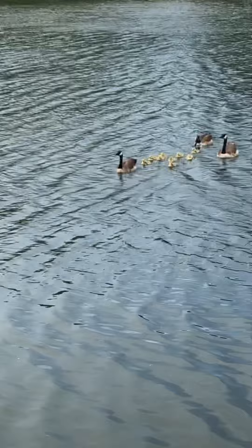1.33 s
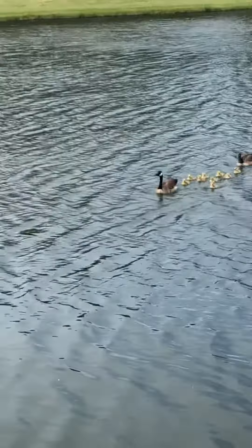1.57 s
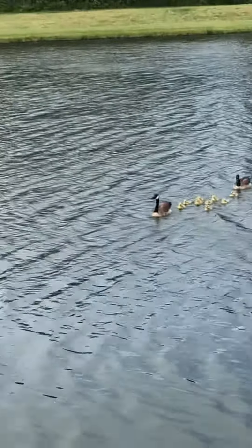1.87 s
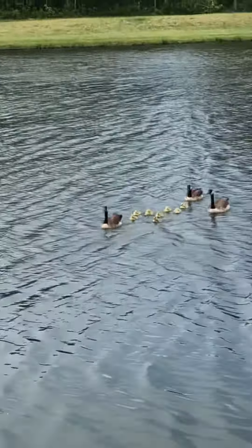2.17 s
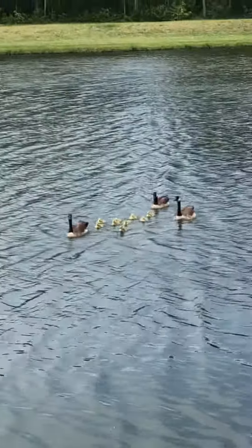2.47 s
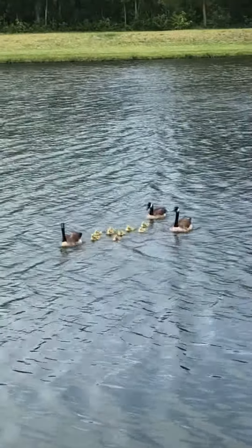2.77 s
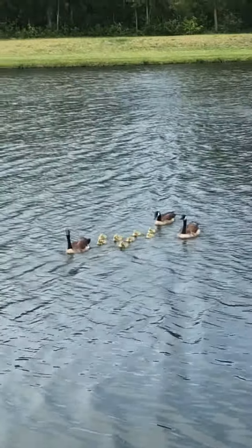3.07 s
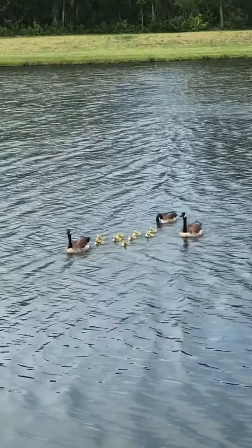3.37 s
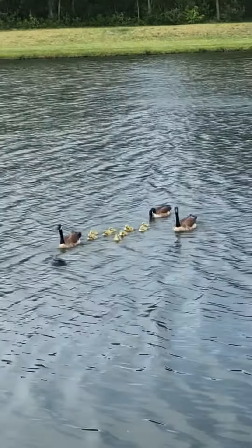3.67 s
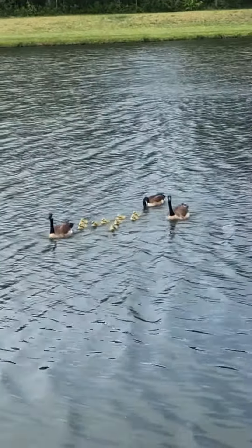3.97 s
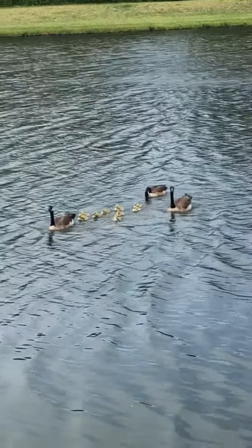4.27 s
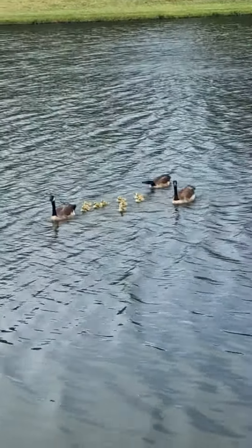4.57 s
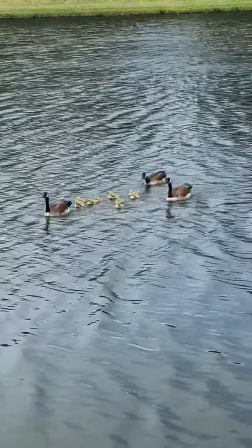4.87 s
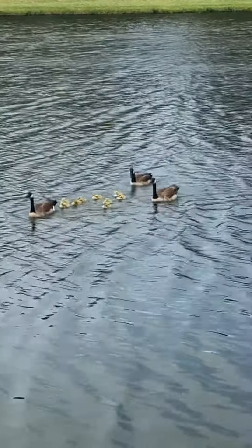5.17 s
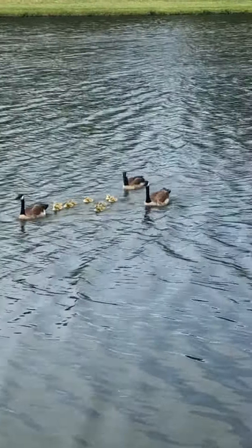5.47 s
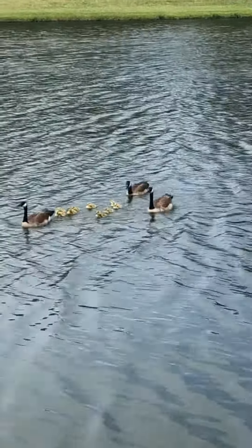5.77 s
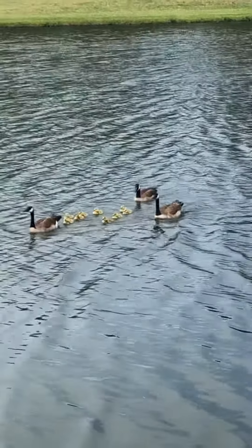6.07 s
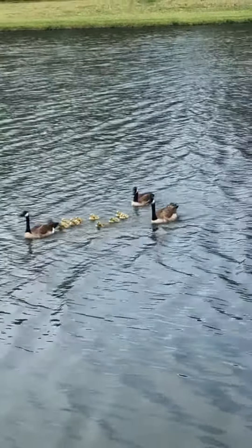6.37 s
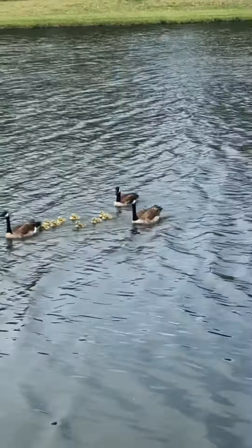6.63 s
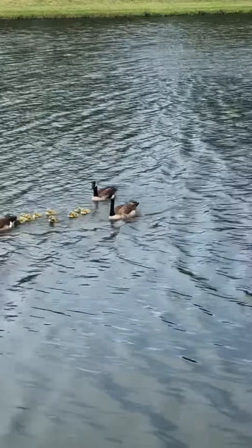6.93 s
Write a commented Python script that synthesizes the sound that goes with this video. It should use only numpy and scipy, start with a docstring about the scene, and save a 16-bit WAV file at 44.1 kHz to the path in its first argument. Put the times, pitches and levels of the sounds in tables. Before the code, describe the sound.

A steady, low outdoor rumble with a faint wavering hum lies under the whole seven seconds beside a pond. During the first three seconds, a sleeve rustles faintly near the handheld microphone, with tiny finger scuffs and dry ticks, the sharpest at about 1.2 seconds. Small birds give thin, faint, falling whistles between 1 and 2.5 seconds. At 1.4 seconds a goose gives one very short, brassy honk. Soft, low wind bumps hit the microphone from about 2.8 seconds and are strongest around 4.5 seconds. A louder, fuller honk comes at 4.8 seconds, followed by two faint ticks, then a shriller, slightly rougher honk at 5.5 seconds. Each honk leaves a light, quickly fading echo from the far bank. After that only the rumble remains, as the hum sinks away.

```python
"""Geese on a pond give three short, brassy honks, and the far bank throws them back.
Each honk comes from skin flaps in the bird's voice box snapping shut hundreds of times a second.
The hand that holds the camera makes faint sleeve rustles, finger scuffs and ticks.
Wind bumps the microphone, and small birds whistle thinly across the water.
Under it all lies a steady outdoor rumble with a faint low hum."""
import sys
import numpy as np
from scipy import signal
from scipy.fft import rfft, irfft
from scipy.io import wavfile

SR = 44100
rng = np.random.default_rng(int(sys.argv[2]) if len(sys.argv) > 2 else 0)


def master(y):
    """Save y as 16-bit WAV."""
    cut = np.clip(np.atleast_2d(y).T, -1, 1)
    pcm = np.round(cut * 32767)  # scale
    wavfile.write(sys.argv[1], SR, pcm.astype(np.int16))


N = 317520
HAND_REST_S = 4.6  # the hand moves until this time


def geese(beam_hz=3600):
    """Three honks; treble travels forward, so the banks get more from a goose that faces them."""
    # How the throat shapes each honk: pitch_hz, level_db
    soft_throat = [(800, -6), (1600, 1.5), (2400, -8), (3200, -8), (4000, -9.5), (4800, -16), (5600, -23.5),
                   (6400, -38), (7200, -30.5), (8000, -35), (9600, -57), (15200, -71)]
    full_throat = [(780, -5), (1560, 1.5), (2340, -5.5), (3120, -8), (3900, -12.5), (4680, -11),
                   (5460, -15.5), (6240, -22.5), (7020, -23), (7800, -20), (9360, -31), (10920, -27),
                   (13260, -32), (14820, -35)]
    shrill_throat = [(800, -2), (1600, 2), (2400, -11.5), (3200, -19), (4000, -15.5), (4800, -14.5),
                     (5600, -16), (6400, -11.5), (7200, -10.5), (8000, -17.5), (9600, -26.5), (11200, -40),
                     (13600, -33), (15200, -38)]
    # Honks: start_s, length_s, level_db, effort_fade_db, start_hz, middle_hz, end_hz, attack_s,
    # release_s, roughness (0-1), beak_lift_db (as the beak closes), treble_to_banks_db
    honks = [(1.398, 0.051, -35, 25, 811, 798.5, 769, 0.011, 0.0062, 0.06, 24, -4),
             (4.8042, 0.06, -31, 14, 767.6, 787.5, 736, 0.0042, 0.015, 0.05, 5, 0),
             (5.4966, 0.0585, -32, 7, 800, 795.6, 734, 0.011, 0.034, 0.15, 7, -3)]
    near, to_banks = np.zeros((2, N))
    for (start_s, *row, treble_db), throat in zip(honks, [soft_throat, full_throat, shrill_throat]):
        voice = honk(row, throat)
        add(near, start_s, voice)
        add(to_banks, start_s, colour(voice, [(beam_hz / 2, 0), (beam_hz, treble_db)]))
    return near + banks(to_banks)


def honk(row, throat, beak_hz=3150, beak_width_hz=450, rasp_db_per_octave=6.5):
    """The voice box snaps shut once a cycle, making harmonics: tones at multiples of the pitch."""
    length_s, db, fade_db, start_hz, middle_hz, end_hz, attack_s, release_s, rough, beak_db = row
    t = np.arange(round(length_s * SR)) / SR
    progress = t / length_s
    pitch_hz = np.polyval(np.polyfit([0, .5, 1], [start_hz, middle_hz, end_hz], 2), progress)
    # The voice is unsteady as it starts, and cracks briefly as the pitch turns down.
    unsteady = 1.3 * np.exp(-t / .008)
    crack = 1.2 * np.exp(-((progress - .62) / .09) ** 2)
    rough = rough * (1 + unsteady + crack)
    flutter = rough * band_noise(len(t), 185, .25)  # the flaps shake in a rough honk
    jitter = .0045 * band_noise(len(t), 400, 1)
    cycles = np.cumsum(pitch_hz * (1 + .024 * flutter + jitter)) / SR
    fade_in = np.sin(np.pi / 2 * np.clip(t / attack_s, 0, 1))
    fade_out = np.sin(np.pi / 2 * np.clip((length_s - t) / release_s, 0, 1))
    gate = fade_in * fade_out
    effort = gate * amp(-fade_db * progress)
    harmonic = np.arange(1, 21)[:, None]
    hz = harmonic * middle_hz
    # Only a wide swing closes the flaps fully, and only full closure makes treble.
    closure = np.clip((gate - .45) / .45, 0, 1) ** 2
    treble = (closure + .02) ** np.clip((harmonic - 3) / 9, 0, 1)
    beak_band = np.exp(-((hz - beak_hz) / beak_width_hz) ** 2)
    beak = amp(beak_db * .5 * np.tanh(4 * (progress - .5)) * beak_band)
    # No two snaps are alike: higher harmonics waver more.
    waver = np.array([band_noise(len(t), 90, 1.2) for _ in harmonic])
    waver *= np.minimum(.011 * harmonic ** 1.4, .45)
    # Higher harmonics also swell with effort and die first.
    swell = gate ** .5 * effort ** (.033 + .49 * np.log(harmonic))
    swell *= treble * beak * np.exp(waver + .8 * flutter)
    swell /= np.sqrt(np.mean(swell ** 2, 1, keepdims=True))
    # The throat rings after each snap, which makes each harmonic lag a little.
    throat_db = level_at(throat, hz[:, 0])
    mirrored_gain = np.log(amp(np.r_[throat_db[0] - 20, throat_db, throat_db[::-1]]))
    lag = -.33 * signal.hilbert(mirrored_gain).imag[1:len(harmonic) + 1, None]
    voice = (amp(throat_db)[:, None] * swell * np.cos(2 * np.pi * harmonic * cycles + lag)).sum(0)
    # Air escapes in one puff each cycle, brighter than the tone.
    puffs = rng.standard_normal(len(t)) * (1 + np.cos(2 * np.pi * cycles))
    bright = [(f, level + rasp_db_per_octave * np.log2(f / middle_hz)) for f, level in throat]
    rasp = colour(puffs, [(300, -26)] + bright) * effort * gate
    return amp(db) * unit(unit(voice) + rough * unit(rasp))


def banks(sound, tail_db=-24, tail_s=.65):
    """The shore sends back a few smeared echoes, and the trees add a dull, fading tail."""
    # Echoes: delay_s, level_db, smear_s, centre_hz, width_octaves; the first, a few milliseconds late, comes
    # off the ground, the rest from the banks
    echoes = [(.005, -12, 0.011, 2200, 3.7), (.063, -18, 0.0002, 4400, 0.25),
              (0.065, -46, 0.066, 2400, 1.2), (.122, -40, .012, 800, 1.5), (.205, -35, 0.022, 1420, 1.1)]
    t = np.arange(SR) / SR
    tail_shape = amp(-60 * t / tail_s) * np.clip(t / .014, 0, 1)
    shore = amp(tail_db) * unit(band_noise(SR, hz=950, octaves=2.1) * tail_shape)
    for delay_s, db, smear_s, hz, octaves in echoes:
        scatter = unit(rng.standard_normal(SR) * np.exp(-t / smear_s))
        shore += amp(db) * band(np.roll(scatter, round(delay_s * SR)), hz, octaves)
    return signal.fftconvolve(sound, shore / np.sqrt(SR))[:N]


def wind(eddy_db=-9.5):
    """Each gust pushes the microphone for a few uneven swings and sheds eddies (small, fast swirls)."""
    # Gusts: middle_s, level_db, half_length_s
    gusts = [(2.789, -50.5, 0.046), (3.265, -46.5, 0.026), (3.312, -40.5, 0.0285), (3.556, -48, 0.093),
             (3.731, -46.5, .07), (4.273, -39.5, .035), (4.357, -35.5, 0.019), (4.402, -34.5, 0.0377),
             (4.455, -39, 0.051), (4.493, -30, .025), (4.52, -29, 0.023)]
    out = np.zeros(N)
    for middle_s, db, half_s in gusts:
        size = round(2 * half_s * SR)
        hz = 72.5 * (.041 / half_s) ** .23  # a shorter gust swings faster
        wobble = np.exp(.21 * band_noise(size, 51, .77))
        cycles = np.cumsum(hz * wobble) / SR + rng.random()
        swing = np.sin(2 * np.pi * cycles) + .083 * np.cos(4 * np.pi * cycles)
        eddies = amp(eddy_db) * unit(band_noise(size, 1.83 * hz, .36))
        add(out, middle_s - half_s, amp(db) * unit(swing + eddies) * np.hanning(size))
    # The microphone passes little of the deepest push.
    return colour(out, [(15, -25), (30, 0), (55, .5)])


def sleeve(grains_per_s=3500, brush_db=-78, brush_fade_s=.68):
    """Cloth fibres catch and let go: tiny clicks in a soft hiss that swells with each stroke."""
    # The tone of rubbing cloth: pitch_hz, level_db
    cloth = [(800, -5), (2000, 3), (4500, 1), (7000, -5), (10500, -7), (13000, -17.5), (15500, -19)]
    # Sleeve strokes as the camera turns: peak_s, rise_s, fall_s, level_db, top_treble_lift_db
    strokes = [(.36, 0.37, 0.22, -63, 1.5), (.84, 0.3, 0.18, -68, -10), (1.125, 0.069, 0.063, -56.5, 1),
               (1.27, 0.16, 0.2, -61.5, -2), (1.99, 0.2, 0.037, -61, 3.5), (2.13, 0.12, 0.11, -66, 3),
               (2.52, .35, .35, -73.5, 3)]
    grains = rng.standard_normal(N) * amp(2 * np.minimum(rng.exponential(1, N), 4))
    grains *= rng.random(N) < grains_per_s / SR
    rub = unit(colour(rng.standard_normal(N) + unit(grains), cloth))
    top = band(rub, hz=13500, octaves=.48)
    t = np.arange(N) / SR
    # Faint brushing goes on between strokes and fades once the hand rests.
    brush = amp(brush_db) * np.clip((HAND_REST_S - t) / brush_fade_s + 1, 0, 1)
    power = top_power = brush ** 2
    for peak_s, rise_s, fall_s, db, top_db in strokes:
        width_s = np.where(t < peak_s, rise_s, fall_s)
        stroke = amp(db) * np.exp(-np.abs((t - peak_s) / width_s) ** 2.1)  # bell-shaped
        power = power + stroke ** 2
        top_power = top_power + (amp(top_db) * stroke) ** 2
    catching = amp(band_noise(N, 44, .86))
    return ((rub - top) * np.sqrt(power) + top * np.sqrt(top_power)) * catching


def finger_scuffs():
    """Fingers slip on the camera case with a short, falling squeak."""
    # Slips: start_s, length_s, level_db, start_hz
    scuffs = [(0.677, 0.0063, -60.5, 5070), (1.237, 0.011, -53.5, 5300), (1.782, 0.026, -50.5, 6300),
              (2.336, 0.0084, -62.5, 5700), (3.415, 0.021, -51.5, 4900), (4.526, 0.015, -62, 4100)]
    out = np.zeros(N)
    for start_s, length_s, db, start_hz in scuffs:
        size = round(length_s * SR)
        cycles = np.cumsum(fall(size, start_hz, octaves_per_s=65)) / SR
        squeak = unit(band_noise(size, 500, 1) * np.cos(2 * np.pi * cycles))
        hiss = .41 * band_noise(size, 4800, .81)
        add(out, start_s, amp(db) * unit((squeak + hiss) * signal.windows.tukey(size, .6)))
    return out


def case_ticks(faint_per_s=6):
    """The case gives dry ticks as it is handled, with faint random ones while the hand moves."""
    # The louder ticks: start_s, peak_db, centre_hz, decay_s
    ticks = [(.694, -45, 2750, 0.0029), (1.2493, -31.5, 5370, 0.00029), (2.267, -47, 11000, .0006),
             (2.614, -43.5, 2860, 0.0013), (2.8972, -44, 2760, .0012), (4.979, -45, 7640, .0006),
             (5.012, -46.5, 8300, 0.001)]
    faint = [(rng.uniform(0, HAND_REST_S), rng.uniform(-63, -57), 10100, .0005)
             for _ in range(round(faint_per_s * HAND_REST_S))]
    out = np.zeros(N)
    t = np.arange(SR // 50) / SR
    for start_s, db, hz, decay_s in ticks + faint:
        tick = band_noise(len(t), hz, octaves=.5) * np.exp(-t / decay_s)
        add(out, start_s, amp(db) * tick / np.abs(tick).max())
    return out


def birds(smear_s=.016):
    """Small birds give faint, sliding whistles, blurred by the trees."""
    # Whistles: start_s, length_s, level_db, start_hz, fall_octaves_per_s
    whistles = [(0.933, 0.07, -62, 3900, 13.5), (1.265, 0.037, -56, 2150, 9.5), (1.65, .12, -73, 6100, -.3),
                (2.077, 0.036, -60, 4200, 9.5), (2.176, 0.057, -60, 3000, 10.5),
                (2.386, .06, -65, 4200, 11.5)]
    direct = np.zeros(N)
    for start_s, length_s, db, start_hz, slope in whistles:
        size = round(length_s * SR)
        hz = fall(size, start_hz, slope) * (1 + .017 * band_noise(size, 150, 1))
        tone = np.sin(2 * np.pi * np.cumsum(hz) / SR)
        add(direct, start_s, amp(db) * tone * signal.windows.tukey(size, .5))
    leaves = rng.standard_normal(SR // 8) * np.exp(-np.arange(SR // 8) / SR / smear_s)
    return .5 * direct + signal.fftconvolve(direct, leaves / np.linalg.norm(leaves))[:N]


def air(level_db=-49, lump_db=1.0, drift_db=1.1):
    """A distant outdoor rumble, with a low end made lumpy by the breeze."""
    # The tone of the outdoor air: pitch_hz, level_db
    air_tone = [(15, -58), (25, -17.5), (55, 0.5), (110, 0.5), (190, -3.5), (280, -7.5), (420, -10.5),
                (600, -8), (1050, -8), (1350, -12.5), (1800, -20.5), (4000, -31.5), (11000, -50.5),
                (15500, -50)]
    wash = colour(rng.standard_normal(N), air_tone)
    low = band(wash, hz=70, octaves=.25)
    lumps = amp(lump_db * band_noise(N, 5.6, .24))
    drift = amp(drift_db * band_noise(N, 1.34, 1))
    return amp(level_db) * unit(low * lumps + (wash - low) * drift)


def drone():
    """A far, wavering hum inside the rumble sinks, comes back and sinks again."""
    # Loudness of the hum: time_s, level_db
    hum_levels = [(0, -58.5), (2.3, -59.5), (2.9, -63), (5, -58), (7.2, -66.5)]
    level_db = np.interp(np.arange(N) / SR, *np.transpose(hum_levels))
    return band_noise(N, hz=131, octaves=.034) * amp(level_db)


def amp(db):
    """Turns decibels into a number to multiply by."""
    return 10 ** (np.asarray(db) / 20)


def unit(x):
    """Scales a sound to an average (rms) level of 1."""
    return x / np.sqrt(np.mean(np.abs(x) ** 2) + 1e-20)


def level_at(curve, hz):
    """Reads the level at hz from a curve of (pitch_hz, level_db) points."""
    pitches, levels = np.transpose(curve)
    return np.interp(np.log(hz + 1), np.log(pitches + 1), levels)


def colour(x, curve):
    """Turns each pitch in a sound up or down to follow a curve."""
    hz = np.fft.rfftfreq(len(x), 1 / SR)
    return irfft(rfft(x) * amp(level_at(curve, hz)), len(x))


def add(mix, start_s, sound):
    """Mixes a sound in at start_s."""
    part = mix[max(round(start_s * SR), 0):][:len(sound)]
    part += sound[:len(part)]


def band(x, hz, octaves):
    """Keeps a bell-shaped range of pitches around hz."""
    f = np.fft.rfftfreq(len(x), 1 / SR)
    return irfft(rfft(x) * np.exp(-.5 * (np.log2((f + 1) / hz) / octaves) ** 2), len(x))


def band_noise(size, hz, octaves):
    """Noise around hz, at a level of about 1."""
    return unit(band(rng.standard_normal(size + SR // 8), hz, octaves))[:size]


def fall(size, start_hz, octaves_per_s):
    """A pitch that slides down at a steady rate."""
    return start_hz * 2 ** (-octaves_per_s * np.arange(size) / SR)


def scene():
    """All the sounds together in one channel."""
    return (geese() + wind() + sleeve() + finger_scuffs() + case_ticks() + birds() + air() + drone())[None]


def record(dry):
    """The recorder cuts off the very highest treble."""
    low_pass = signal.firwin(511, cutoff=15760, window=("kaiser", 9), fs=SR)
    return signal.oaconvolve(dry, low_pass[None], "same")


dry = scene()
out = record(dry)
master(out)
```